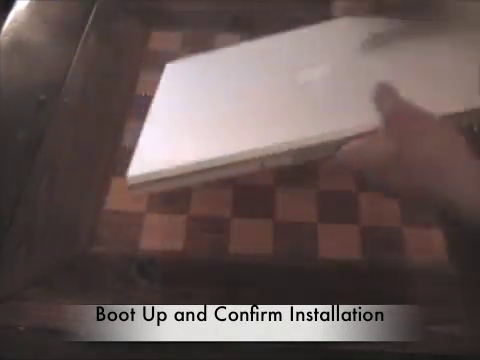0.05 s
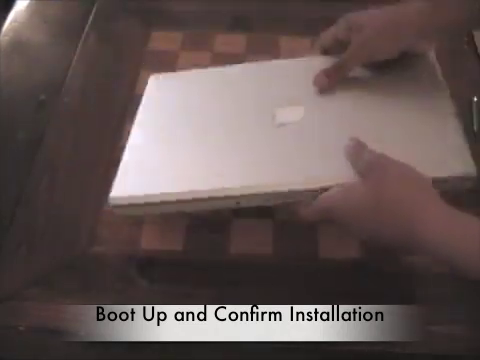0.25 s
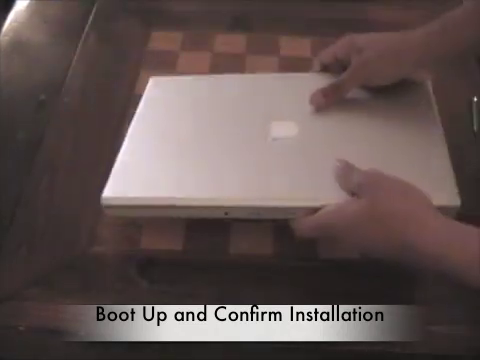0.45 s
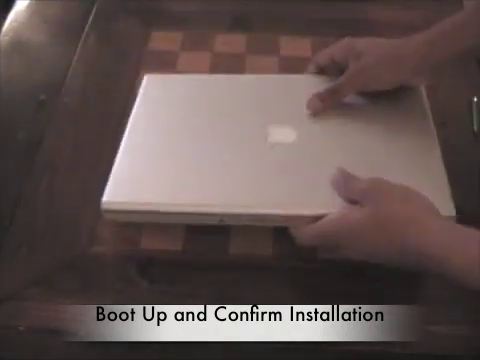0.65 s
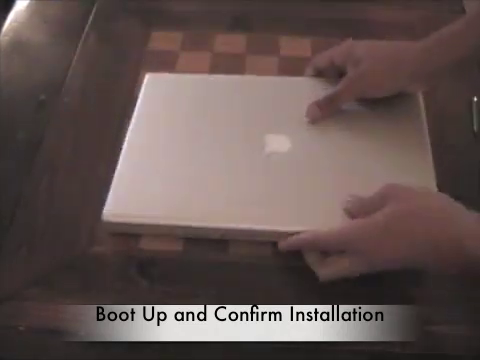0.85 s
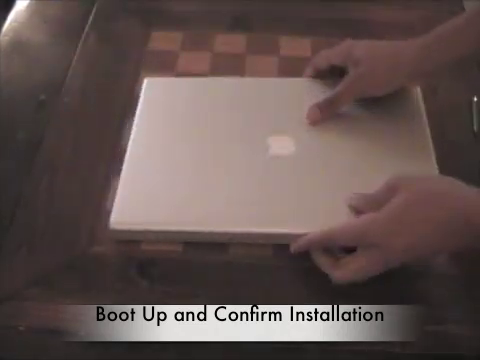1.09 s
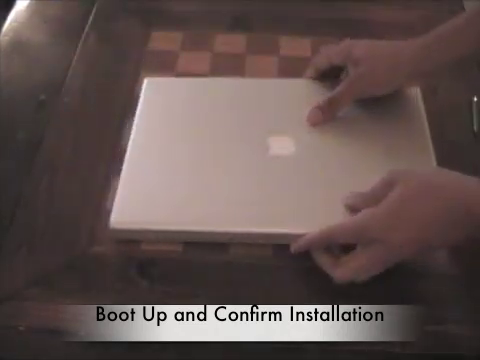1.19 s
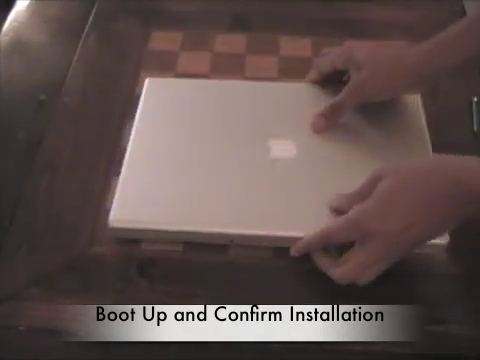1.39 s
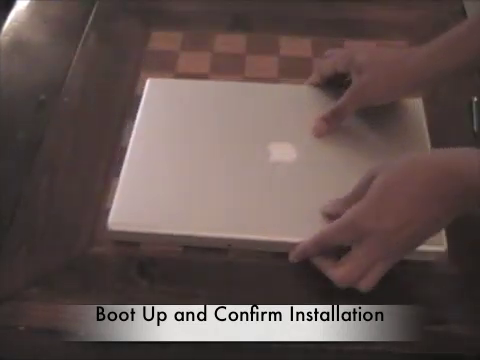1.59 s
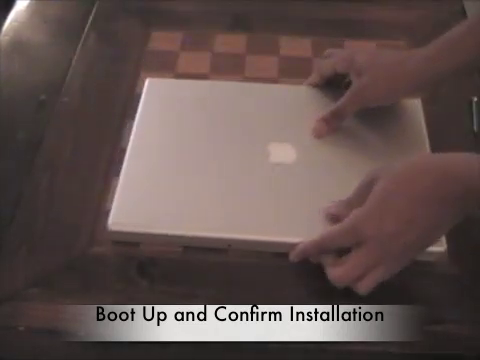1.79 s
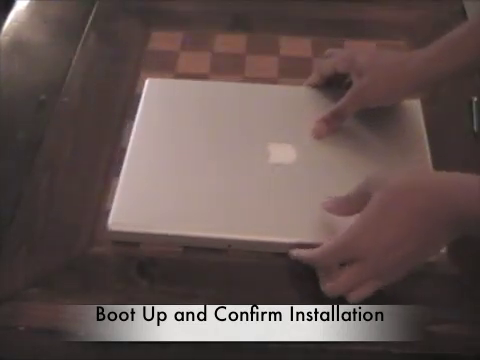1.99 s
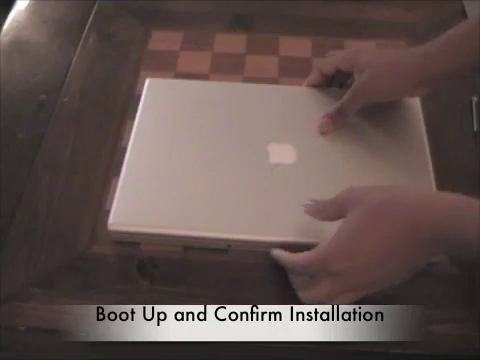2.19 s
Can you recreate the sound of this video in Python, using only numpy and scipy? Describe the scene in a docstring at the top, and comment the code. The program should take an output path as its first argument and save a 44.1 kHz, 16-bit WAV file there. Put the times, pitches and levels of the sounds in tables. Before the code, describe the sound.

A laptop is set down on a wooden table: one loud, sharp knock, a softer bump, then a second hard knock and a few lighter taps as it is nudged. Close microphone in a small room, with faint hiss.

```python
"""A wooden games table in a small room, heard from the stereo microphone of a tape camera close by.
Skin brushes the lid of a closed laptop as it is lowered. One edge knocks down, overloading the input;
a small metal part ticks, the laptop rocks back, the other edge drops, and last it is nudged.
Each contact rings the low modes of the table and the dense, short modes of the case; the room answers.
Throughout, the camera combs the sound and adds hiss and a thin whine."""
import sys
import numpy as np
from scipy import signal
from scipy.fft import rfft, irfft, next_fast_len
from scipy.io import wavfile

SR = 44100
rng = np.random.default_rng(int(sys.argv[2]) if len(sys.argv) > 2 else 0)


def transcribe(signal):
    """Save signal, clipped to [-1, 1], as a 16-bit WAV file at the path in sys.argv[1]."""
    frames = np.atleast_2d(signal).T
    limited = np.clip(frames, -1, 1)
    pcm = np.round(limited * 32767).astype(np.int16)
    wavfile.write(sys.argv[1], SR, pcm)


N = 99225

# Stereo width of knocks and rubbing, side against mid: frequency_hz, side_db
CONTACT_WIDTH = [(100, -19.5), (500, -18), (1200, -16), (2500, -13), (4500, -9), (10000, -2.5)]
# Stereo width of skin hiss and steady hiss: frequency_hz, side_db
HISS_SPREAD = [(60, -3.5), (500, 2), (2000, -8), (8000, -3)]


def knocks():
    """Each contact rings case, table and room; a soft one loses the treble, a small one the bass."""
    # Laptop meeting table: start_s, level_db, treble_hz (high = hard), bass_hz (high = small contact),
    # case_db, table_db, heave_db, boom_db, thump_db, click_db
    contacts = [ (.193, -33, 1920, 300, 0, -4, -14, -15, -10, -17),
                (0.212, -49, 2500, 300, 2, -8, -10, -15, -13, -8),
                (0.2152, 0.5, 2800, 97, -1, 0, 0, 0, -9, -13),
                (0.474, -15.5, 1690, 110, -3, 3, 4, 1, -9, -20.5),
                (0.9041, -6.5, 1340, 272, 0.5, -6, -13, 2, -9, -22),
                (0.9097, -3.5, 1630, 430, 4, -5, -26, -31, -8, -6),
                (0.9216, -20, 1320, 68, -4, 13.5, 1, 11.5, 10, -6),
                (1.4047, -27, 245, 130, -8, 4.5, 2, -6.5, -7, -28),
                (1.5498, -14.5, 1240, 70, 4, -9, 0, -6.5, 0, -22),
                (1.653, -33.5, 1400, 150, 3.5, -9.5, -8, -32, 2, -30),
                (1.8893, -12, 1047, 327, 1, 0.5, -1, -20, -2.5, -27),
                (1.912, -19, 700, 150, 10, -0.5, 2, -22, -12, -20),
                (1.9755, -18.5, 1180, 100, 2, 8, -8, -6, -12, -23),
                (1.9807, -9.5, 615, 115, 2, -8.5, 3.5, -12.5, -1.5, -26),
                (2.042, -33.5, 420, 220, -4, -3, 7, -9, -7, -21)]
    # Modes of the laptop case: pitch_hz, level_db, t60_s
    case_modes = [(670.5, -15, 0.058), (719.7, -18.5, 0.16), (800.7, -20, 0.095), (895, -26, 0.067),
                  (949.6, -17.5, 0.11), (975, -36.5, 0.13), (1149, -36.5, 0.11), (1228, -25.5, .22),
                  (1422, -14.5, 0.043), (1575, -29, 0.32), (2920, -22, 0.088), (3037, -19, 0.06),
                  (3990, -17, 0.047), (9080, -19, .3)]
    # Modes of the table: pitch_hz, level_db, t60_s
    table_modes = [(181.7, -12, 0.26), (213.9, -8, 0.25), (228.6, -20, 0.36), (246.3, -18.5, 0.4),
                   (277.3, -24, 0.39), (326.9, -14.5, 0.19), (376.5, -25, 0.33), (422.3, -28.5, 0.37),
                   (509, -27.5, 0.35), (558, -23, 0.22)]
    # The table top gives way and springs back: pitch_hz, level_db, t60_s
    heave_modes = [(177.7, -9.5, 0.055), (324.7, -13.5, 0.11)]
    # Lowest mode of the top, rung by the laptop's full weight: pitch_hz, level_db, t60_s
    boom_mode = [(125.6, -15, 0.4)]
    ring_s, table_rise_s = 0.9, 0.001
    thump_hz, thump_t60_s = 67.3, 0.55
    t = np.arange(next_fast_len(int(ring_s * SR), True)) / SR
    rise = 1 - np.exp(-t / table_rise_s)
    thump = modes([(thump_hz, -29, thump_t60_s)], t)
    heave, boom = modes(heave_modes, t), rise * modes(boom_mode, t)
    out = np.zeros((2, N + len(t)))
    for start_s, level_db, treble_hz, bass_hz, *balance in contacts:
        case_db, table_db, heave_db, boom_db, thump_db, click_db = balance
        body = clatter(t) + undb(case_db) * struck_modes(case_modes, t)
        body += undb(table_db) * rise * struck_modes(table_modes, t) + undb(heave_db) * heave
        body = signal.sosfilt(signal.butter(2, treble_hz, fs=SR, output="sos"), body)
        body = signal.sosfilt(signal.butter(2, bass_hz, "high", fs=SR, output="sos"), body)
        body += undb(boom_db) * boom + undb(thump_db) * thump
        i = int(start_s * SR)
        out[:, i:i + len(t)] += undb(level_db) * (body + undb(click_db) * edge_click(t))
    return out[:, :N]


def struck_modes(table, t, spot_db=3):
    """Decaying sines whose strength and phase depend on the spot that is struck."""
    out = 0
    for hz, db, t60 in table:
        strength, phase = rng.random(2)
        gain = undb(db + spot_db * (2 * strength - 1.5))
        out += gain * fade(t, t60) * np.sin(2 * np.pi * (hz * t + phase))
    return out


def clatter(t, t60_s=0.076, room_build_s=0.019):
    """Countless short modes of case and table, and the room's swelling answer, in third-octave bands."""
    # Spectrum of the dense modes: band_hz, level_db
    dense_modes = [(35, -14), (100, -7.5), (200, -10.5), (330, -4.5), (450, -1.5), (700, -4), (1400, 1.5),
                   (2100, -6.5), (3000, -1), (6000, 0.5), (14000, -29)]
    # Reverberation of the small room: band_hz, level_db, t60_s
    room = [(50.3, -29, 0.6), (123, -7.5, 0.86), (252, -1.5, 0.27), (510, -7, 0.4), (1180, -5.5, 0.35),
            (2920, -6, 0.33), (7140, -2, 0.45), (13900, -16.5, .25)]
    hz = np.arange(len(t) // 2 + 1) * SR / len(t)
    mid, side = rfft(rng.standard_normal((2, len(t))))
    side *= undb(curve(hz, CONTACT_WIDTH))
    stereo = np.array([mid + side, mid - side])
    out = 0
    for centre_hz in 1000 * 2 ** (np.arange(-14, 12) / 3):
        in_band = np.abs(np.log2(np.maximum(hz, 1) / centre_hz)) < 1 / 6
        band = irfft(stereo * in_band, len(t))
        out += undb(9 + curve(centre_hz, dense_modes)) * burst(band, fade(t, t60_s))
        tail = fade(t, curve(centre_hz, room, column=2)) * (1 - np.exp(-t / room_build_s))
        out += undb(1.5 + curve(centre_hz, room)) * burst(band[:, ::-1], tail)
    return out


def edge_click(t, pan_db=-2):
    """A hard edge adds a bright click with a sharp snap and a longer tail, a little to the right."""
    # Spectrum of the click: frequency_hz, level_db
    spectrum = [(300, -10), (1500, 16.5), (3500, -0.5), (6000, 5), (9000, -7.5), (10500, -9), (12000, -1),
                (13500, -18), (15000, -49)]
    edge = stereo_noise(spectrum, CONTACT_WIDTH, len(t))
    click = burst(edge, fade(t, t60_s=0.03))
    snap = undb(-4.5) * burst(edge, fade(t, t60_s=0.0056))
    tail = undb(-4) * burst(edge[:, ::-1], fade(t, t60_s=0.3))
    return undb(14) * (click + snap + tail) * pan(pan_db)


def metal_tick(start_s=0.4595):
    """A small metal part, probably the lid latch, ticks just before the laptop rocks back."""
    # Modes of the part: pitch_hz, level_db, t60_s
    metal_modes = [(3960, -2, 0.035), (4270, -8, 0.031), (4640, -10, 0.035)]
    t = np.maximum(np.arange(N) / SR - start_s, 0)
    return undb(-44) * modes(metal_modes, t)


def brushes():
    """Skin slides on the lid: a hiss that swells and dies, with a lower rub from the case."""
    # Strokes, their three times taken in rising order: start_s, peak_s, end_s, level_db, rub_db
    strokes = [(-.05, 0.004, 0.17, -54, -13), (0.113, 0.146, 0.21, -47, -5.5),
               (0.653, .745, 1.1, -52.5, -41), (0.765, 0.896, 0.897, -51.5, 4.5),
               (1.0, 1.15, 1.79, -61.5, 7.5), (1.253, 1.244, 1.33, -64.5, 4.5)]
    # Hiss of sliding skin: frequency_hz, level_db
    skin_spectrum = [(100, -25), (700, 1), (2000, 2), (4000, 3), (6500, 7.5), (9000, 1), (12000, -1),
                     (15000, -19)]
    # Body of the rubbed case: frequency_hz, level_db
    rub_spectrum = [(60, -10), (200, 3), (400, 4), (600, -0.5), (780, 2), (1000, 8.5), (1300, 3.5),
                    (1900, -1.5), (3500, -10), (9000, -38)]
    t = np.arange(N) / SR
    skin = stereo_noise(skin_spectrum, HISS_SPREAD, N)
    rub = stereo_noise(rub_spectrum, CONTACT_WIDTH, N)
    out = 0
    for *times_s, level_db, rub_db in strokes:
        swell = np.interp(t, np.sort(times_s), [0, 1, 0])
        out += undb(level_db) * swell * (skin + undb(rub_db) * rub)
    return out


def hiss(level_db=-55):
    """Steady hiss of room and microphone."""
    # Noise floor: frequency_hz, level_db
    spectrum = [(15, -27.5), (25, -4), (133, -7), (378, -10), (523, -12), (582, -4.5), (722, -15),
                (1140, -11.5), (1800, -19), (2300, -15), (4380, -21.5), (6380, -22.5), (6920, -17.5),
                (13500, -33), (15500, -61.5)]
    return undb(level_db) * stereo_noise(spectrum, HISS_SPREAD, N)


def drum_whine(pan_db=0.5):
    """The camera's spinning tape drum gives a thin, high whine."""
    # Harmonics of the drum: pitch_hz, rms_db
    harmonics = [(6744, -58.5), (8392, -78), (8692, -73), (9590, -73.5)]
    t = np.arange(N) / SR
    tones = sum(undb(db) * np.sin(2 * np.pi * (hz * t + rng.random())) for hz, db in harmonics)
    return np.sqrt(2) * tones * pan(pan_db)


def hum_comb(x, drum_hz=149.85, feedback=0.66):
    """The camera notches each multiple of the drum rate by subtracting a running mean of earlier turns."""
    size = next_fast_len(N + SR // 4, True)
    hz = np.arange(size // 2 + 1) * SR / size
    turn_delay = np.exp(-2j * np.pi * hz / drum_hz)
    notches = (1 - turn_delay) / (1 - feedback * turn_delay)
    return irfft(rfft(x, size) * notches, size)[:, :N]


def undb(db):
    """Decibels to gain."""
    return 10 ** (np.asarray(db) / 20)


def pan(db):
    """Channel gains that put left db above right."""
    return undb([[db / 2], [-db / 2]])


def curve(hz, table, column=1):
    """Read one column of a table on a log-frequency axis."""
    points = np.array(table, float)
    return np.interp(np.log(np.maximum(hz, 1)), np.log(points[:, 0]), points[:, column])


def fade(t, t60_s):
    """Exponential decay, 60 dB down at t60_s."""
    return np.exp(-np.log(1000) * t / t60_s)


def modes(table, t):
    """Decaying sines that start together."""
    return sum(undb(db) * fade(t, t60) * np.sin(2 * np.pi * hz * t) for hz, db, t60 in table)


def noise(spectrum, size):
    """Unit-rms noise with a given spectrum."""
    hz = np.arange(size // 2 + 1) * SR / size
    y = irfft(rfft(rng.standard_normal(size)) * undb(curve(hz, spectrum)), size)
    return y / y.std()


def stereo_noise(spectrum, width, size):
    """Stereo noise whose side part follows a width table."""
    hz = np.arange(size // 2 + 1) * SR / size
    side = irfft(rfft(noise(spectrum, size)) * undb(curve(hz, width)), size)
    return noise(spectrum, size) + np.array([side, -side])


def burst(x, envelope):
    """Stereo noise under an envelope, with unit mean energy per channel."""
    y = x * envelope
    return y / np.sqrt(np.sum(y ** 2) / 2)


def scene():
    """At the microphone: knocks, a tick and brushing skin over steady hiss."""
    return knocks() + metal_tick() + brushes() + hiss()


def record(dry, ceiling=0.71, top_hz=15000):
    """The input clips on the hardest knock, the comb hollows the sound, whine leaks in, the top is cut."""
    heard = hum_comb(np.clip(dry, -ceiling, ceiling)) + drum_whine()
    return signal.sosfilt(signal.ellip(8, 0.2, 70, top_hz, fs=SR, output="sos"), heard)


dry = scene()
out = record(dry)
transcribe(out)
```